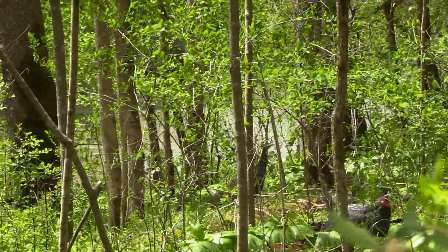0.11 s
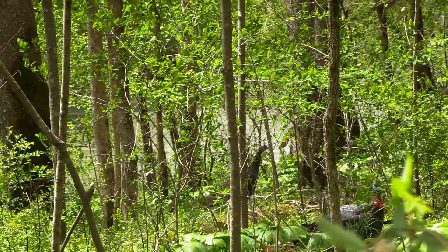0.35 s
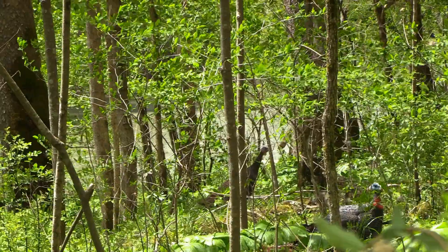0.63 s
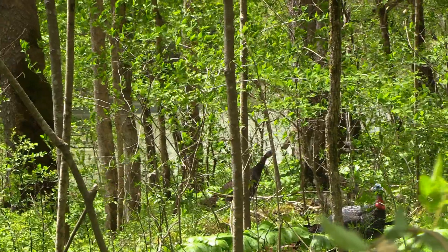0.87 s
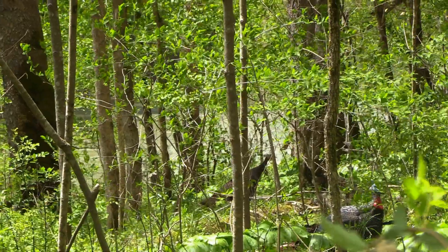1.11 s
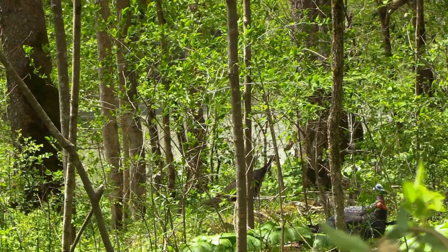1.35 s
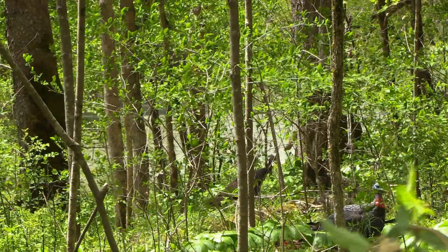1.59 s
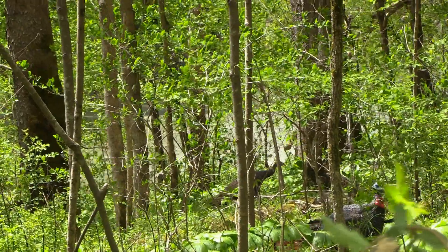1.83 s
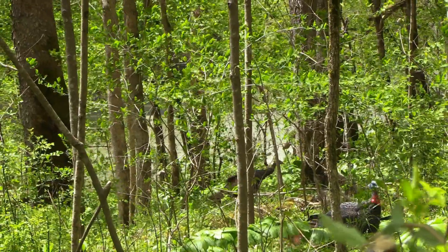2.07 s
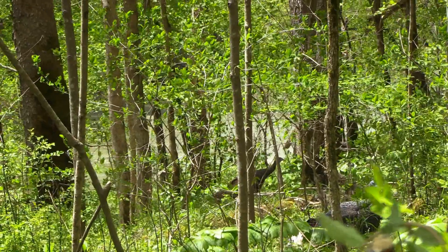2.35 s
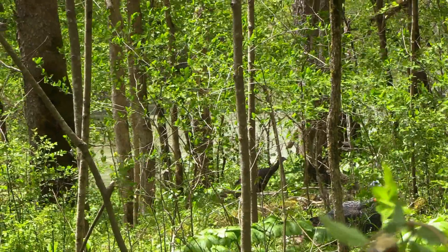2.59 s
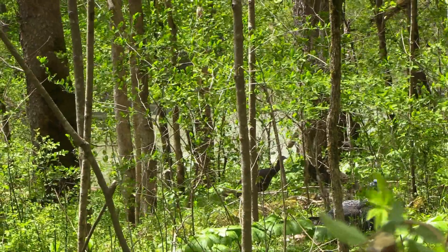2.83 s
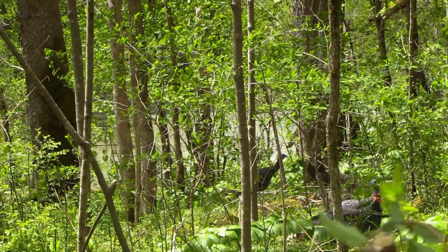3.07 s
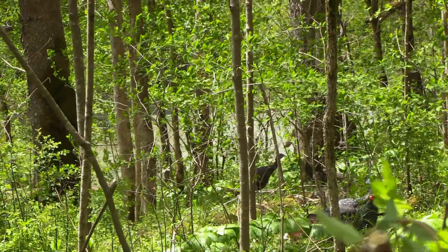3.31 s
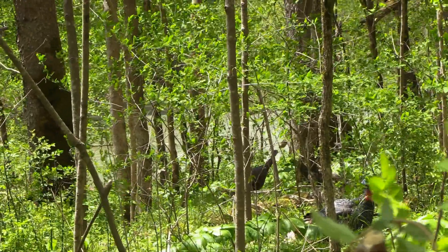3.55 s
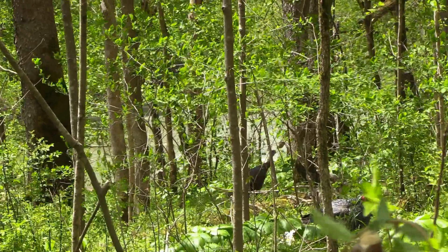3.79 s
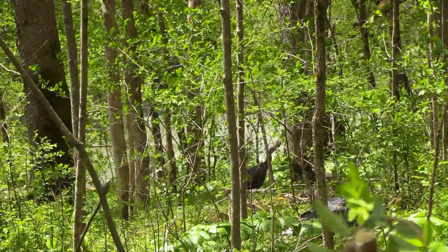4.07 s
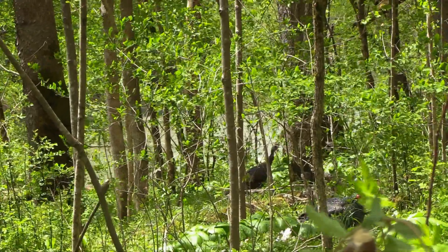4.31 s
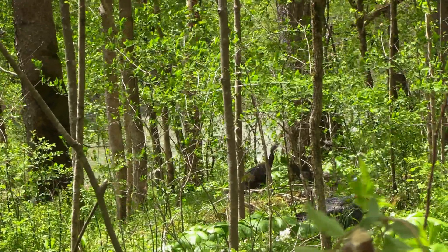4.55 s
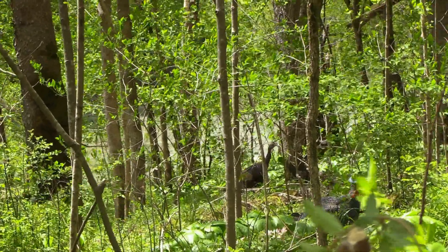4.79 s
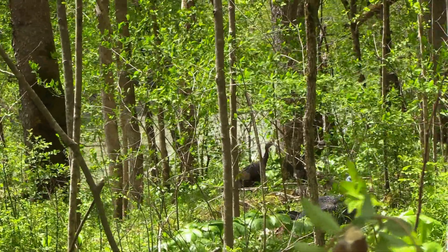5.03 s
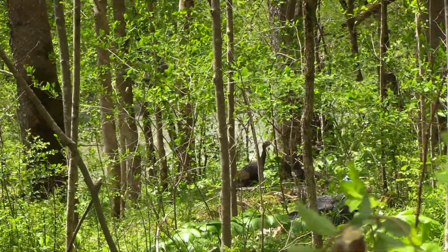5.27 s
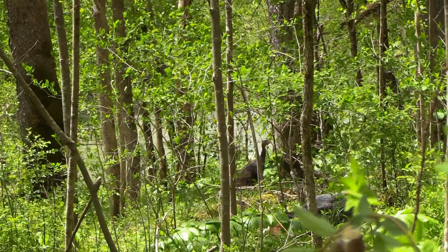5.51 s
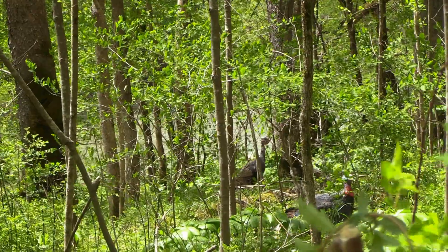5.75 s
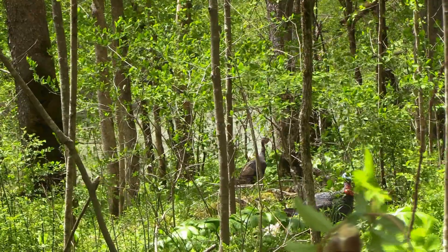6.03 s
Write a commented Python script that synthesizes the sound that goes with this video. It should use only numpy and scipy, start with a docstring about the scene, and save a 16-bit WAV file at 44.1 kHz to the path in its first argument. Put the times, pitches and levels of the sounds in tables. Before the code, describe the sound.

A quiet wood with soft, wide stereo air and faint leaf hiss. From 0.2 s a turkey close on the left yelps five times, at about 0.2, 0.55, 0.9, 1.25 and 1.65 s. Each yelp is loud, abrupt and under a tenth of a second, nasal near 700 Hz with bright overtones, flipping into a rougher higher voice; a faint echo dies off the trunks. A small bird's thin gliding whistle slips in at 1.2 s. In the pause, soft far yelps come at 2.0, 3.2 and 3.9 s, a high falling whistle at 3.5 s, and small dry litter snaps, clearest around 4.2 s. The second run starts weakly at 4.5 s, then comes strongly at 4.85, 5.15, 5.5 and 5.9 s, more varied in rasp and with less echo. A few ticks accompany it, and the low air bed is slightly fuller to the end at about 6.1 s.

```python
"""Turkey yelps in a leafy wood

A wild turkey close on the left yelps five times, pauses, and yelps five times more, echoing off the trunks.
Its low and high voice membranes take turns or fight, which makes a note clear or raspy.
A small bird's gliding whistles and far yelps are plain tones; litter snaps are short noise bursts.
Leaves and far air hiss as banded stereo noise, and the input flattens the loudest peaks.
"""
import sys
import numpy as np
from scipy import signal
from scipy.fft import rfft, irfft, next_fast_len
from scipy.io import wavfile
from scipy.ndimage import uniform_filter1d

SR = 44100
rng = np.random.default_rng(int(sys.argv[2]) if len(sys.argv) > 2 else 0)


def ratio(d):
    """dB to gain"""
    e = np.asarray(d, float) / 20
    return 10 ** e


def wav_record(signal):
    """Record a signal, one row per channel, as 16-bit PCM in the file named by sys.argv[1]."""
    frames = np.transpose(np.atleast_2d(signal))
    bounded = np.clip(frames, -1, 1)
    # unit amplitude maps onto the largest positive 16-bit level
    quanta = np.round(bounded * 32767).astype(np.int16)
    wavfile.write(sys.argv[1], SR, quanta)


N = 270774


def rms_one(x):
    """Scale a sound to rms 1."""
    return x / np.sqrt(np.mean(x ** 2) + 1e-20)


def at_hz(points, hz, axis=1):
    """Read one column of a frequency table, joined on a log axis."""
    points = np.array(points)
    return np.interp(np.log(hz + 1), np.log(points[:, 0]), points[:, axis])


def band_pass(x, low_hz, high_hz, order=2):
    """Keep the band between two corner frequencies."""
    return signal.sosfilt(signal.butter(order, [low_hz, high_hz], "band", fs=SR, output="sos"), x)


def wobble(size, hz):
    """Low-passed noise of rms 1, a random drift no faster than about hz."""
    settle = 9000   # samples dropped while the filter starts up
    low_pass = signal.butter(2, hz, fs=SR, output="sos")
    return rms_one(signal.sosfilt(low_pass, rng.standard_normal(size + settle))[settle:])


def causal(gain_db):
    """Minimum-phase response for a dB curve on an FFT grid, by folding its cepstrum."""
    cepstrum = irfft(gain_db * np.log(10) / 20)
    half = len(cepstrum) // 2
    cepstrum[1:half] *= 2
    cepstrum[half + 1:] = 0
    return np.exp(rfft(cepstrum))


def turkey():
    """All yelps at both microphones: the right hears them late and shadowed, and the trunks send back an echo."""
    # one control curve a yelp: (t/s, low membrane f/Hz, breath level/dB, beak: overtones over fundamental/dB)
    yelps = [
        [(0.206, 708.2, -5.5, 20), (0.245, 703.4, -8, 20.5), (0.255, 750, -11, 18), (0.276, 702, -15, -2)],
        [(0.552, 695, -4.5, 17.5), (0.585, 695, -9, 17), (0.6, 706, -10.5, 15), (0.613, 697, -12.5, -2)],
        [(0.899, 718.4, -7, 19), (0.945, 720, -9.5, 15.5), (0.956, 724, -14, 7), (0.966, 724, -9, -8)],
        [(1.261, 705, -7.5, 16), (1.285, 683.5, -8, 15), (1.318, 705, -10, 13), (1.326, 730, -15, 7.5),
         (1.338, 727, -18.5, 5.5)],
        [(1.64, 689, -6, 14), (1.67, 689.4, -8.5, 15), (1.68, 748, -8.5, 14), (1.693, 738, -15, 7),
         (1.705, 760, -13.5, -3.5)],
        [(4.484, 690, -23.5, 5), (4.496, 716, -26.5, 4.5), (4.5, 727, -13, 11.5), (4.525, 731, -15, 12),
         (4.535, 702.6, -16, 8), (4.559, 742, -22.5, -2)],
        [(4.835, 680, -6.5, 12), (4.845, 653.6, -11, 20), (4.872, 640, -9, 13), (4.879, 707, -8, 22),
         (4.888, 709, -10.5, 12), (4.898, 710, -18.5, 0)],
        [(5.156, 702, -9.5, 20), (5.167, 799.5, -10, 12.5), (5.173, 725, -9, 15.5), (5.18, 761, -5.5, 15.5),
         (5.2, 749, -10.5, 11.5), (5.208, 787, -10.5, 8), (5.22, 752, -18, -3.5)],
        [(5.504, 689, -8.5, 16.5), (5.525, 748.6, -7.5, 21), (5.55, 765, -9.5, 17.5), (5.574, 722, -20.5, -4.5)],
        [(5.923, 677, -17, 3.5), (5.933, 670.7, -9.5, 24), (5.96, 651.6, -9.5, 17), (5.966, 807, -17, 0),
         (5.976, 793, -10.5, 2.5), (5.988, 843, -28.5, -5.5)],
    ]
    # turns of the high membrane, a row a yelp: (first takeover t/s, time between takeovers/s, rests from t/s,
    # starting pitch f/Hz, rasp 0-1); where the rest comes before the first takeover it never leads
    takeovers = [(0.211, 0.0135, 0.28, 1045, 0.61), (0.559, 0.015, 0.62, 1055, 0.64),
                 (0.908, 0.0165, 0.97, 1055, 0.75), (1.27, 0.016, 1.317, 1045, 0.56),
                 (1.648, 0.02, 1.677, 995, 0.7), (4.547, 0.03, 4.1, 1100, 1),
                 (4.894, 0.03, 4.897, 1100, 0.35), (5.212, 0.03, 5.216, 1010, 0.6),
                 (5.514, 0.015, 5.58, 925, 0.47), (5.967, 0.03, 5.981, 915, 0.1)]
    # lift of the partials above the beak resonance, one a yelp: (level/dB)
    top_lifts = [-2.5, -4, -5, -1, -1.5, -3.5, -9, -1, -2, -1.5]
    # right microphone against the left, head shadow and a near reflection: (f/Hz, level/dB, lag/radians)
    shadow = [(500, 1, .7), (720, .4, 1.3), (1050, -4, 2.1), (1290, 0, 2.3), (1400, 0, 3.3),
              (1550, -6, 4.7), (1680, -9, 6.6), (2070, -8, 7.7), (2600, -12, 8.5), (2900, -9, 8.3),
              (3700, -7, 9.4), (4500, -4, 10.7), (8000, -6, 14.0)]
    # the bird turns from the trunks between the runs: (t/s, echo level/dB on top of echo_db)
    turn_away = [(2.5, 1), (4.0, -5.5)]
    echo_db = -40.5
    left = np.zeros(N + 8192)
    for curve, takeover, top_db in zip(yelps, takeovers, top_lifts):
        at, note = yelp(curve, *takeover, top_db)
        left[at:at + len(note)] += note

    size = next_fast_len(N + SR)
    hz = np.arange(size // 2 + 1) * SR / size
    to_right = ratio(at_hz(shadow, hz)) * np.exp(-1j * at_hz(shadow, hz, axis=2))
    right = irfft(rfft(left, size) * to_right, size)

    turned_db = np.interp(np.arange(N) / SR, *np.transpose(turn_away))
    side_db = np.array([[0], [1.0]])   # the echo is a little stronger on the right
    echo = trunks(left[:N]) * ratio(echo_db + side_db + turned_db)
    return np.stack([left[:N], right[:N]]) + echo


def yelp(curve, first, turn, rest, high_hz, rasp, top_db, size=8192):
    """Two membranes puff into the throat; while both move they pull each other's timing and grow unsteady."""
    # neck and open beak, relative response: (f/Hz, level/dB)
    throat = [(520, -49), (720, -11), (1050, 1), (1450, -1), (1750, -3.5), (2100, 3.5), (2450, -12),
              (2800, -8), (3250, -14), (3700, -2), (4000, -20), (4400, -40.5), (6500, -33), (10000, -39.5),
              (15000, -41)]
    at, *controls = np.transpose(curve)
    s = at[0] - 0.02 + np.arange(size) / SR
    age = np.clip(s - at[0], 0, at[-1] - at[0])
    low_hz, level_db, bright_db = [np.interp(s, at, c) for c in controls]

    # the high membrane leads for part of each turn, longer as the yelp goes on
    hold_share, hold_grows_per_s = 0.536, 3.5
    held = (s - first) / turn % 1 < hold_share + hold_grows_per_s * age
    leads = (s > first) & (s < rest) & held
    leads = uniform_filter1d(leads * 1.0, int(0.0028 * SR))

    # its share of the voice while it leads, idles, and stirs as the yelp starts
    lead_share, idle_share, onset_share, onset_s = 0.89, 0.017, 0.2, 0.007
    stir = onset_share * np.exp(-age / onset_s)
    share = np.clip(idle_share + stir + (lead_share - idle_share) * leads, 0, 1)

    # its turns are duller and outgrow the tiring low one; the voice sinks while they change over
    high_duller_db, high_gains_db, high_gains_db_per_s, handover_dip_db = 5, -1.5, 87.5, 2.5
    level_db = level_db + leads * (high_gains_db + high_gains_db_per_s * age)
    level_db = level_db - handover_dip_db * 4 * leads * (1 - leads)
    bright_db = bright_db - leads * high_duller_db

    fight = 4 * share * (1 - share)   # 1 when both membranes sound equally
    unrest = rasp * (fight + uniform_filter1d(fight, int(0.011 * SR)))   # spreads a little around each fight
    high_sag_hz_per_s = 404
    low_phase = cycle(low_hz, 0.004 + 0.025 * unrest)
    high_phase = cycle(high_hz - high_sag_hz_per_s * age, 0.0093 + 0.038 * unrest)
    pull = 0.8 * unrest   # radians; makes sum and difference tones between the partials
    low = puffs(low_phase + pull * np.sin(high_phase), sharp=0.85)
    high = puffs(high_phase + 1.19 * pull * np.sin(low_phase), sharp=0.47)

    hoarse = 0.16   # extra breath noise in a clear stretch, times the rasp
    breathiness = 0.023 + hoarse * rasp + 0.14 * unrest
    breath = breathiness * wobble(size, 3000.0) * (low + share * high)
    air = (1 - share) * low + 0.5 * share * high + breath

    hz = np.arange(size // 2 + 1) * SR / size
    top_lift_db = top_db / (1 + (2500 / (hz + 1)) ** 8)
    voiced = rfft(air) * causal(at_hz(throat, hz) + top_lift_db)
    upper = 1 / (1 + (1180 / (hz + 1)) ** 12)   # the overtones, which a wider beak lets out
    fundamental = evened(irfft(voiced * (1 - upper)))
    overtones = evened(irfft(voiced * upper))
    voice = (fundamental + ratio(bright_db) * overtones) / np.sqrt(1 + ratio(2 * bright_db))

    opening = 1 / (1 + np.exp(-(s - at[0] - 0.003) / 0.0011))
    closing = np.exp(-np.clip(s - at[-1] + 0.0028, 0, 1) / 0.003)
    return round(s[0] * SR), voice * ratio(level_db) * opening * closing


def cycle(hz, unsteady):
    """Phase of a membrane whose pitch shakes when it is unsteady, from a random start."""
    shaken_hz = hz * (1 + unsteady * wobble(len(hz), 410.0))
    return 2 * np.pi * (np.cumsum(shaken_hz) / SR + rng.random())


def puffs(phase, sharp):
    """One puff of air a cycle, each partial `sharp` times the one below."""
    return (1 - sharp) ** 2 / (1 - 2 * sharp * np.cos(phase) + sharp ** 2)


def evened(x):
    """Rms 1 over every few milliseconds: the breath, not the puff pattern, sets the loudness."""
    power = uniform_filter1d(uniform_filter1d(x ** 2, 110), 110)
    return x / np.sqrt(np.abs(power) + 1e-12)


def trunks(sound):
    """Scattered echo off the trunks: a dying noise, another one for each side."""
    t60_s, rise_s = 0.65, 0.0099
    s = np.arange(SR) / SR
    scatter = rng.standard_normal((2, SR)) * ratio(-60 * s / t60_s) * np.clip(s / rise_s, 0, 1)
    scatter = band_pass(scatter, 800, 1500, order=1)   # leaves soak up the treble
    scatter /= np.linalg.norm(scatter[0])
    return signal.fftconvolve(sound[None], scatter, axes=1)[:, :N]


def far_yelps():
    """Short soft tones with rounded ends, since only one partial of each far yelp carries."""
    # far yelps: (t/s, length/s, f/Hz, peak level before panning/dB)
    far = [(2, 0.071, 1390, -53.5), (3.18, .05, 760, -56), (3.24, 0.059, 766, -53),
           (3.92, 0.055, 1410, -55)]
    now, out = np.arange(N) / SR, 0
    for at, length, hz, level_db in far:
        shape = np.sin(np.pi * np.clip((now - at) / length, 0, 1)) ** 0.33
        out = out + ratio(level_db) * shape * np.sin(2 * np.pi * hz * now)
    return out * ratio([[3.0], [-1.5]])   # left, right


def songbird():
    """Thin gliding whistles off to the left, broken up by the leaves and smeared by their echo."""
    # one curve a phrase: (t/s, f/Hz, rms level before flicker and panning/dB)
    whistles = [
        [(1.21, 3110, -70), (1.235, 2700, -63), (1.26, 3300, -63), (1.34, 3300, -62), (1.38, 4300, -62),
         (1.48, 4050, -70)],
        [(3.468, 4500, -58), (3.482, 3650, -55), (3.505, 3200, -58), (3.575, 2950, -60), (3.61, 3400, -59),
         (3.63, 3500, -70)],
    ]
    now, song = np.arange(N) / SR, 0
    for phrase in whistles:
        s, hz, level_db = np.transpose(phrase)
        glide_hz = np.interp(now, s, hz)
        tone = np.sqrt(2) * np.sin(2 * np.pi * np.cumsum(glide_hz) / SR)
        song = song + tone * ratio(np.interp(now, s, level_db, -140, -140))
    flicker_db = 4 * wobble(N, 60.0) - 1.5
    direct = song * ratio(flicker_db) * ratio([[2.5], [-2.5]])   # left, right
    return direct + ratio(1.5) * trunks(song)


def litter(size=2048):
    """Each snap is a clump of tiny cracks that dies in a few milliseconds, coloured around its centre pitch."""
    # snaps in the leaf litter: (t/s, peak level before panning/dB, centre f/Hz, decay time/s, left over right/dB)
    ticks = [(1.362, -26, 1300, 0.00079, -11), (1.363, -31, 480, 0.0013, 10), (2.415, -41, 2500, .003, 0),
             (2.511, -36, 4000, 0.0022, -7), (2.53, -37.5, 2400, 0.002, 0), (3.013, -38, 2470, .004, 0),
             (3.75, -41, 2500, .003, 0), (3.8, -44, 4000, 0.014, 0), (4.176, -52, 6500, 0.0045, 4),
             (4.205, -31.5, 3520, 0.0068, 0), (4.23, -47, 6500, .006, 0), (4.314, -35.5, 3900, 0.0014, 0),
             (4.389, -49, 7500, .006, -2), (4.449, -43, 7460, 0.0011, -6), (4.587, -38.5, 4000, 0.0049, 0),
             (5.243, -43, 5500, 0.003, 3), (5.496, -38, 1890, 0.0019, 21), (5.894, -31, 1900, 0.0028, 11),
             (5.918, -42, 7460, .002, -9)]
    out, s = np.zeros((2, N)), np.arange(size) / SR
    for at, peak_db, hz, length, pan_db in ticks:
        cracks = rng.standard_normal(size) ** 3 * np.exp(-s / length)   # cubing makes the noise spiky
        snap = band_pass(cracks, hz / 1.5, hz * 1.5)
        sides_db = peak_db + pan_db / 2 * np.array([[1], [-1]])
        i = round(at * SR)
        out[:, i:i + size] += snap / np.abs(snap).max() * ratio(sides_db)
    return out


def wood(patchy_db):
    """Half-octave bands of stereo noise: far air that swells slowly, and leaf hiss above that flickers a little."""
    # leaves and far air, relative spectrum: (f/Hz, level per Hz/dB)
    spectrum = [(15, -70), (25, -53.5), (84, -9), (242, -4), (326, -4), (363, -3), (754, -11), (988, -5.5),
                (1100, -8.5), (1480, -8), (2350, -13), (3340, -16), (5430, -23.5), (16000, -45)]
    # slow swell of the whole bed: (t/s, rms level/dB)
    swell = [(0, -48.5), (1, -48), (3, -46.5), (4.4, -44.5), (6.14, -44)]
    # how alike left and right are: (f/Hz, correlation)
    likeness = [(60, 0.75), (150, 0.94), (380, 0.83), (950, 0.24), (2380, 0.36), (5980, 0.53),
                (15000, 0.88)]
    leaf_db, leaf_follows = -3, -0.3   # hiss offset; share of the swell it follows, here slightly against it
    s, level_db = np.transpose(swell)
    now = np.arange(N) / SR
    gust = wobble(N, 2.5)
    breeze_db = leaf_db - (1 - leaf_follows) * np.interp(now, s, level_db - level_db.mean())
    white = rng.standard_normal((2, 2, N))   # neighbouring bands use different noise
    edges = 24 * 2 ** np.arange(0, 9.6, 0.5)
    out = 0
    for k, (low, high) in enumerate(zip(edges, edges[1:])):
        mid, side = band_pass(white[k % 2], low, high)
        hz = np.sqrt(low * high)
        alike = at_hz(likeness, hz)
        leafy = hz / (hz + 1200)   # leaves matter more towards the treble
        gain = ratio(at_hz(spectrum, hz) + leafy * (breeze_db + patchy_db * gust))
        out = out + gain * (np.sqrt(1 + alike) * mid + np.sqrt(1 - alike) * side * [[1], [-1]])
    return rms_one(out) * ratio(np.interp(now, s, level_db))


def scene():
    """The turkey in front of far yelps, songbird, litter and wood."""
    return turkey() + far_yelps() + songbird() + litter() + wood(patchy_db=0.27)


def top_cut(x):
    """Nothing passes above the cut-off."""
    return signal.sosfilt(signal.butter(12, 16480, fs=SR, output="sos"), x)


def record(dry):
    """The input bends unevenly, so loud notes leave a low thud, and it flattens near full scale; the top is cut."""
    thud = band_pass(dry ** 2, 25, 110)
    bent = dry + 0.0046 * dry ** 2 + 0.0095 * thud
    ceiling, knee = 1.06, 5.1   # full scale is 1; a higher knee bends more abruptly
    flat = bent / (1 + np.abs(bent / ceiling) ** knee) ** (1 / knee)
    cut = signal.sosfilt(signal.cheby2(12, 60, 16300, fs=SR, output="sos"), flat)
    return top_cut(cut)


dry = scene()
out = record(dry)
wav_record(out)
```